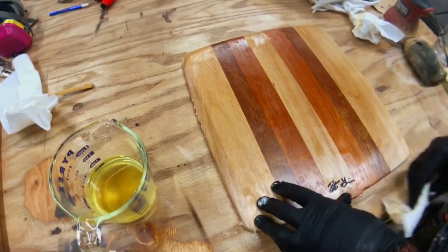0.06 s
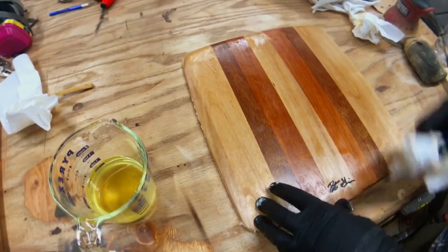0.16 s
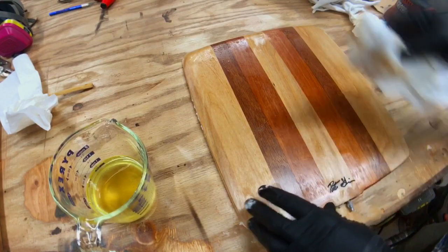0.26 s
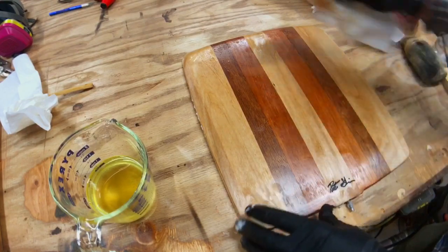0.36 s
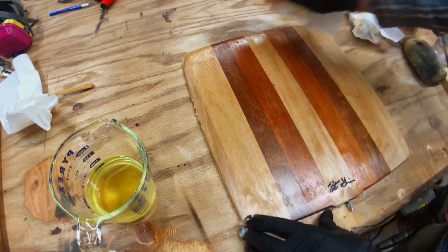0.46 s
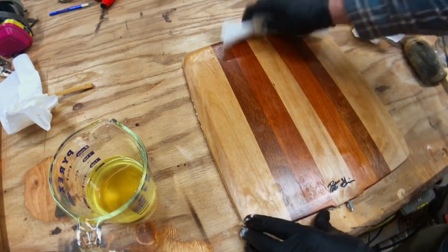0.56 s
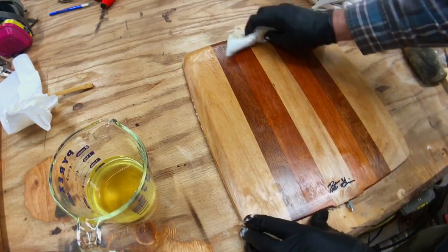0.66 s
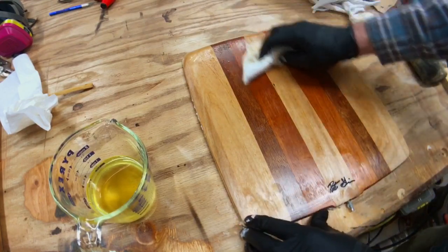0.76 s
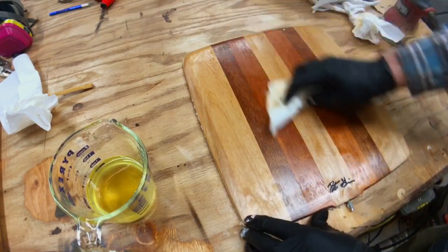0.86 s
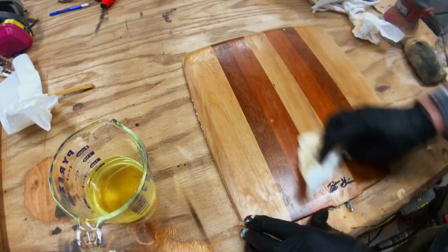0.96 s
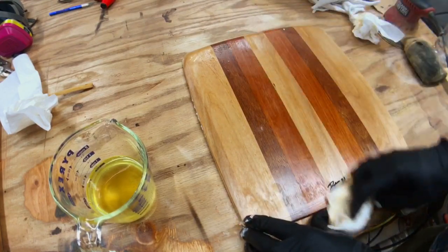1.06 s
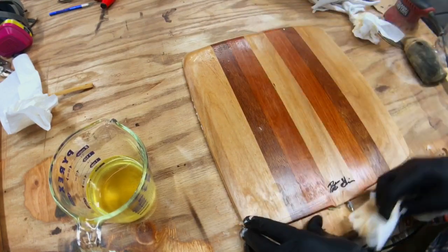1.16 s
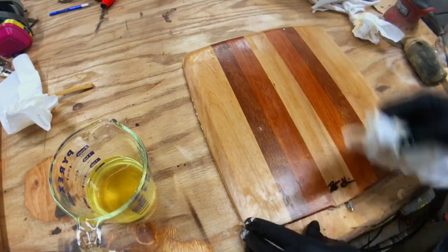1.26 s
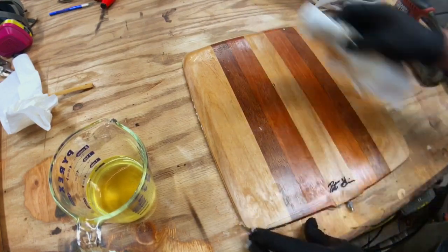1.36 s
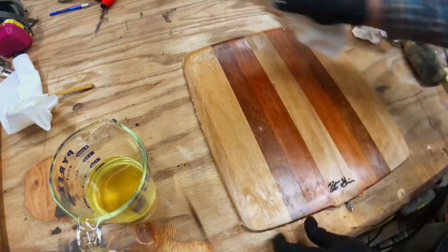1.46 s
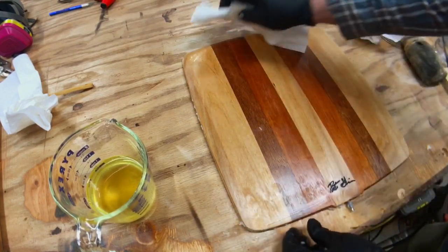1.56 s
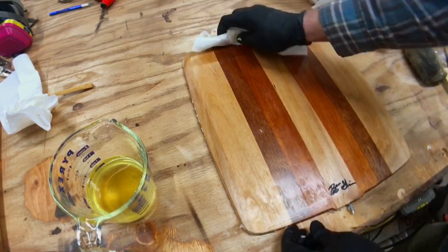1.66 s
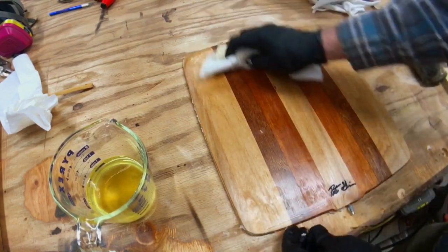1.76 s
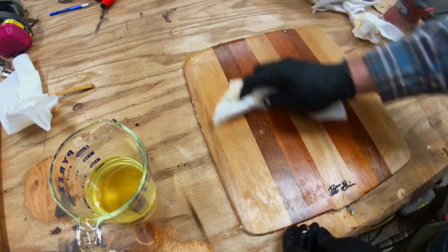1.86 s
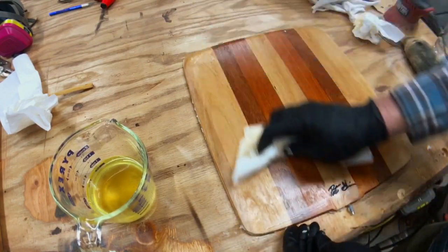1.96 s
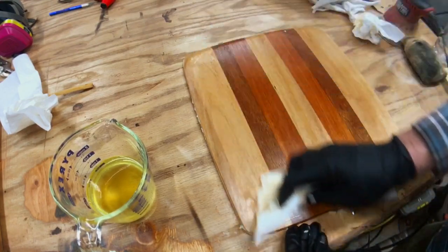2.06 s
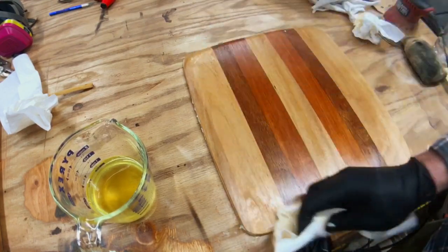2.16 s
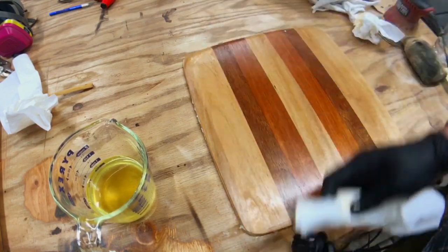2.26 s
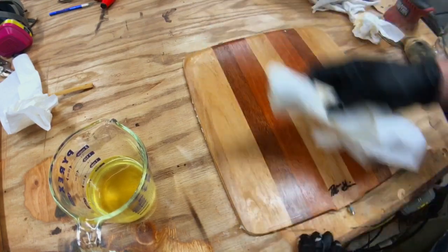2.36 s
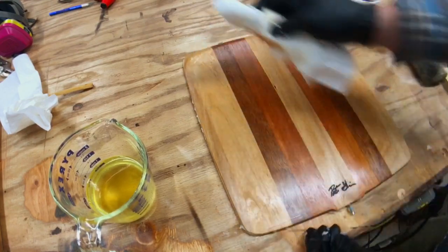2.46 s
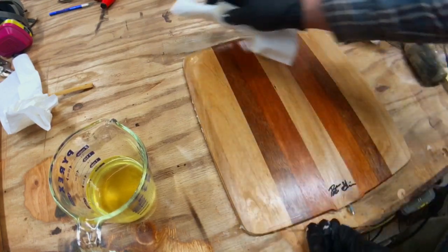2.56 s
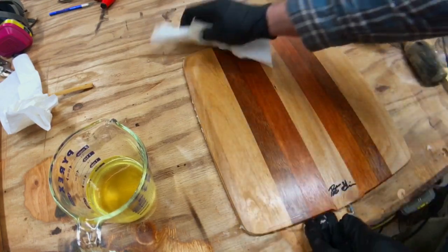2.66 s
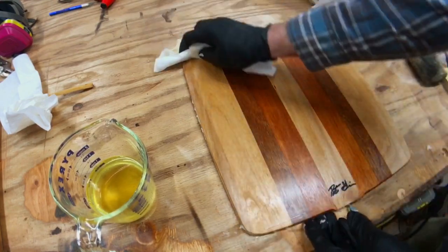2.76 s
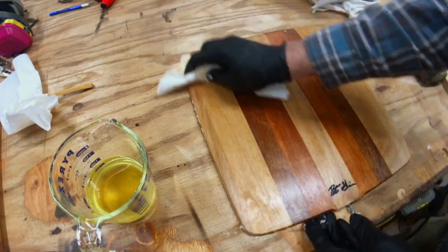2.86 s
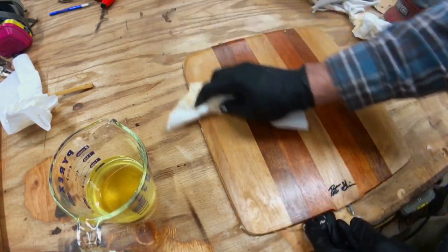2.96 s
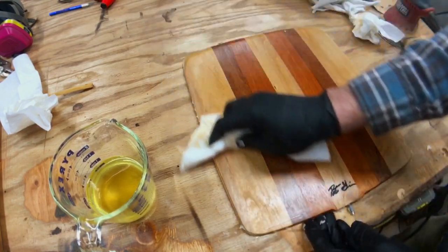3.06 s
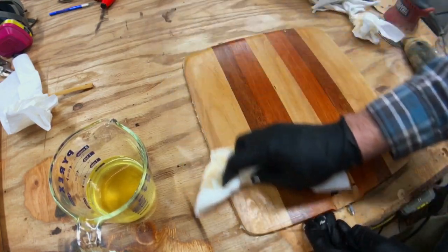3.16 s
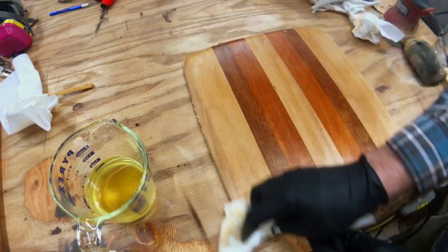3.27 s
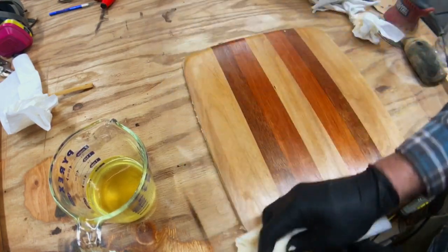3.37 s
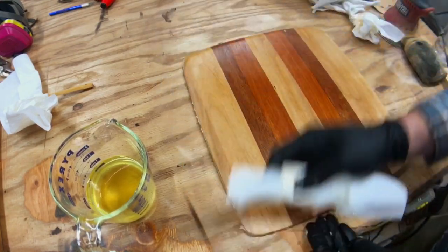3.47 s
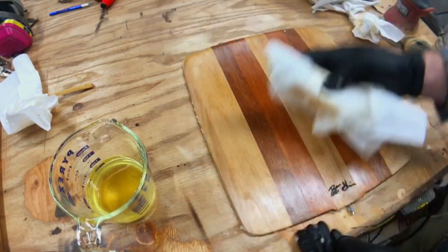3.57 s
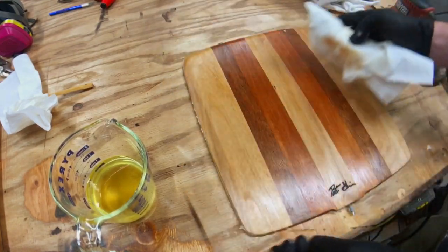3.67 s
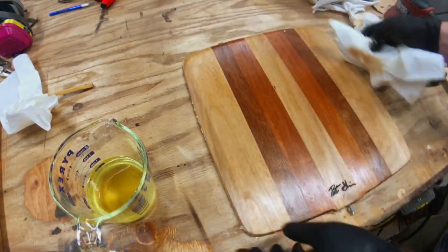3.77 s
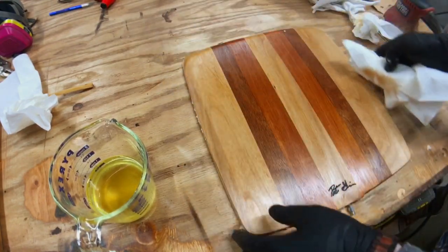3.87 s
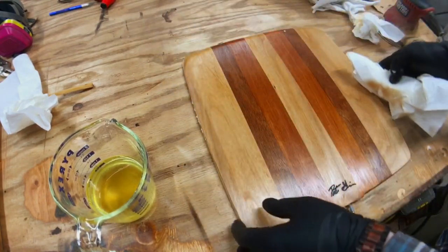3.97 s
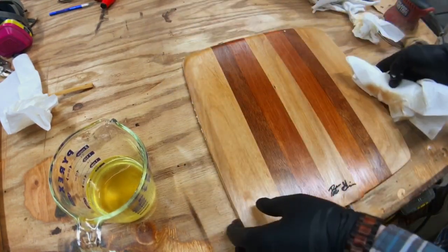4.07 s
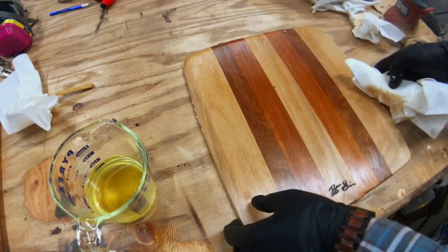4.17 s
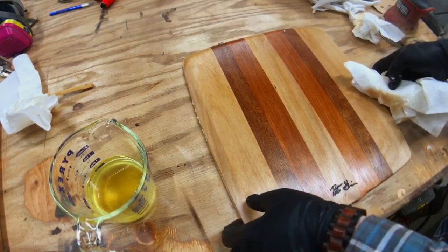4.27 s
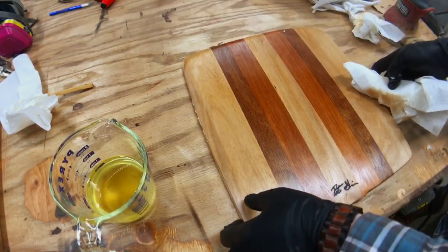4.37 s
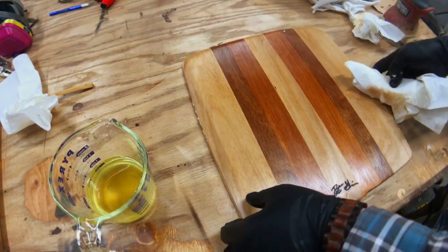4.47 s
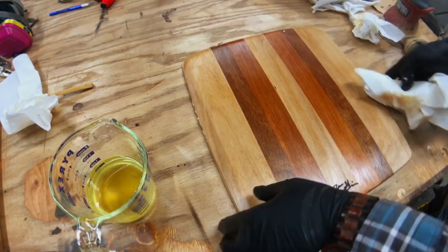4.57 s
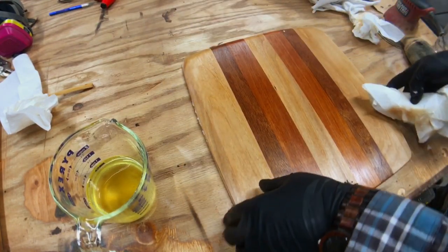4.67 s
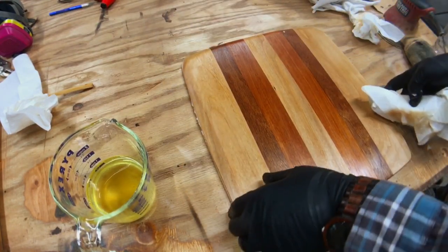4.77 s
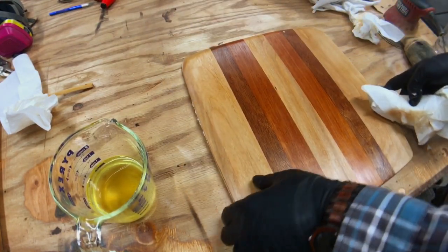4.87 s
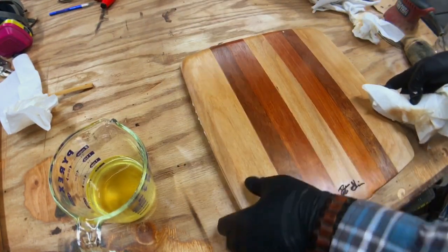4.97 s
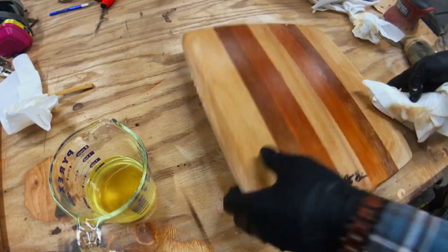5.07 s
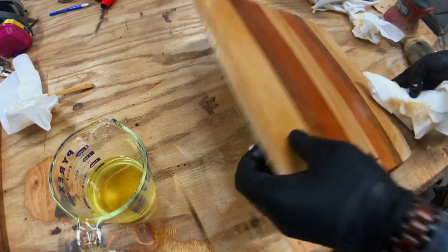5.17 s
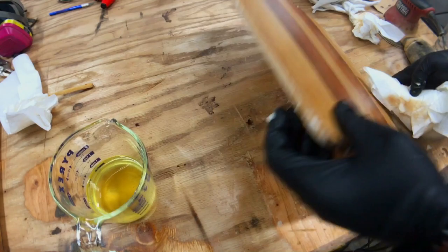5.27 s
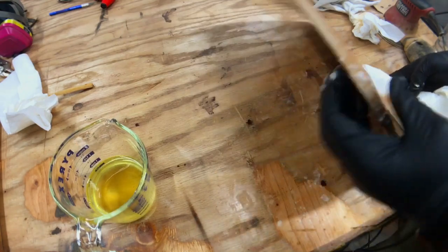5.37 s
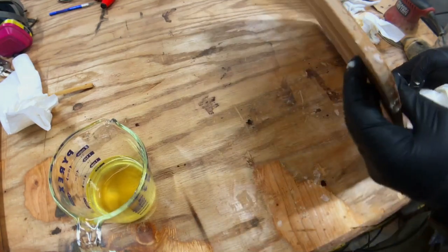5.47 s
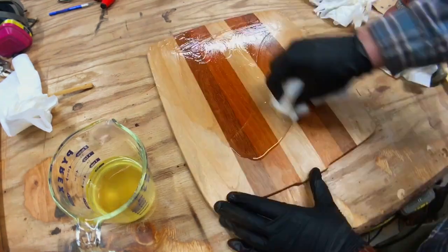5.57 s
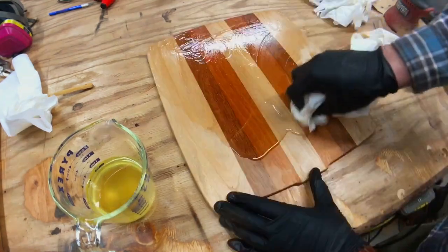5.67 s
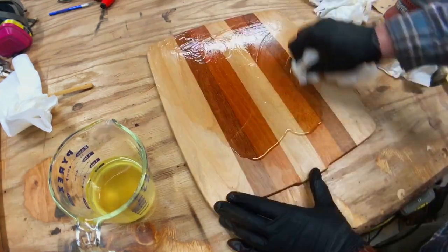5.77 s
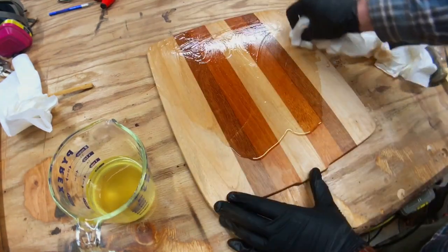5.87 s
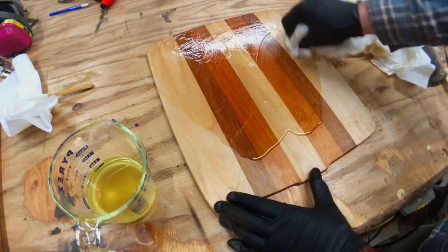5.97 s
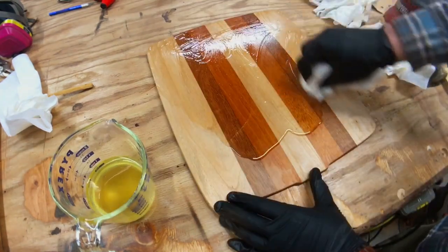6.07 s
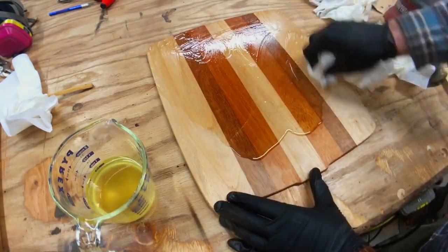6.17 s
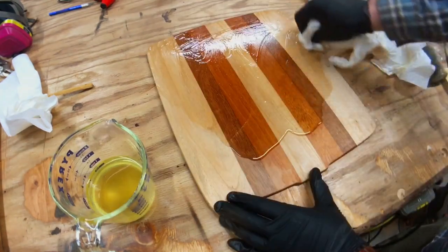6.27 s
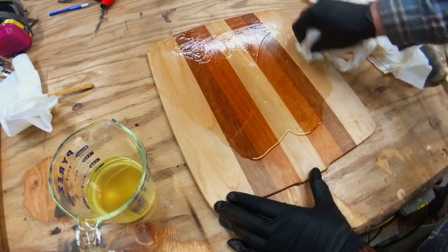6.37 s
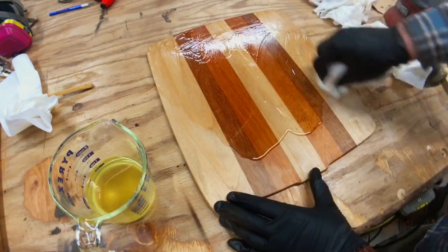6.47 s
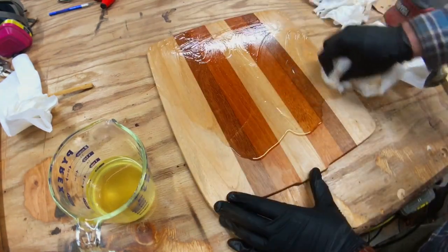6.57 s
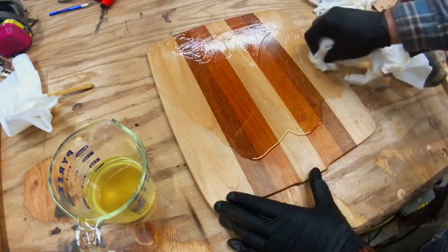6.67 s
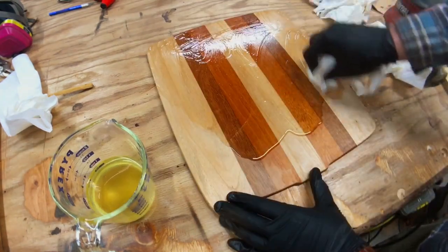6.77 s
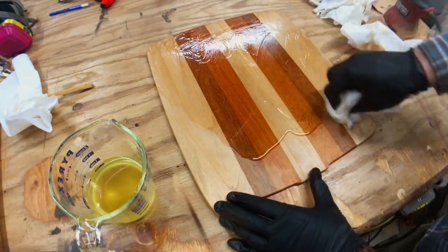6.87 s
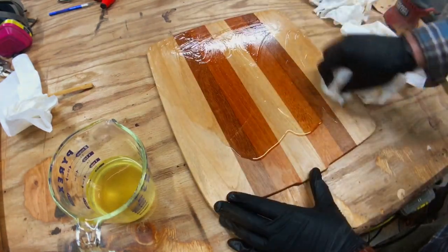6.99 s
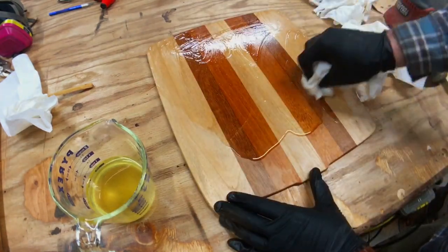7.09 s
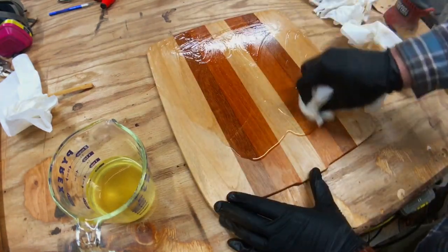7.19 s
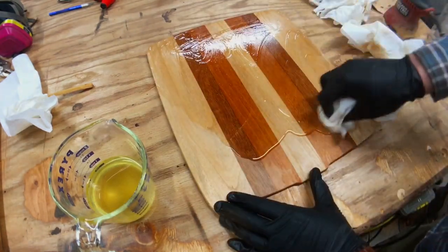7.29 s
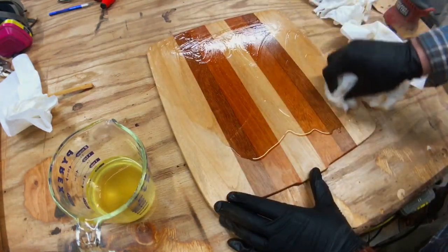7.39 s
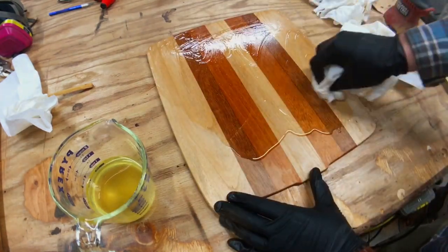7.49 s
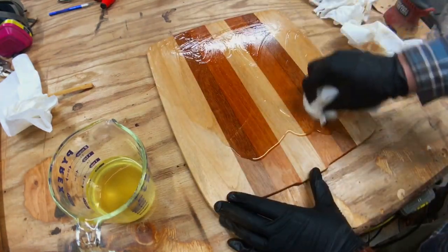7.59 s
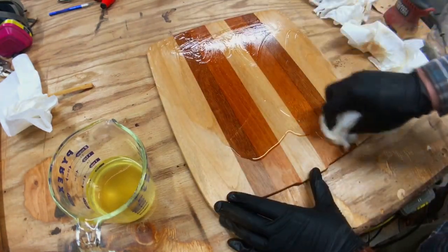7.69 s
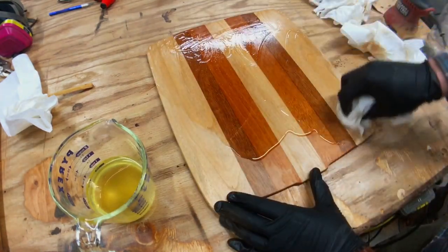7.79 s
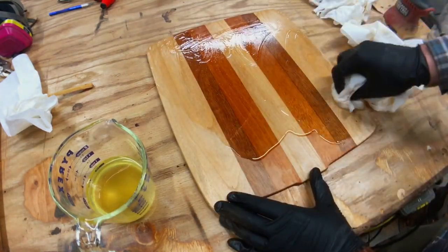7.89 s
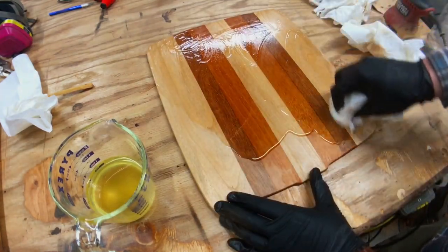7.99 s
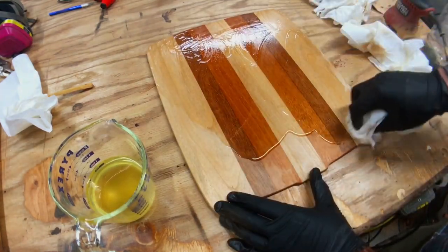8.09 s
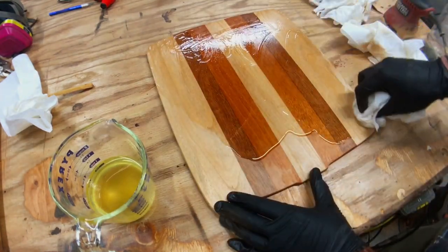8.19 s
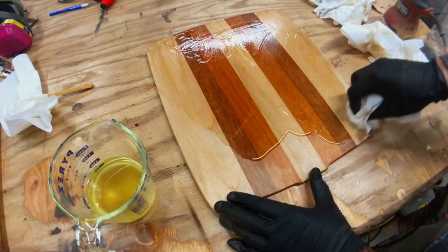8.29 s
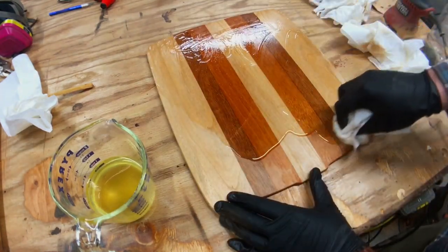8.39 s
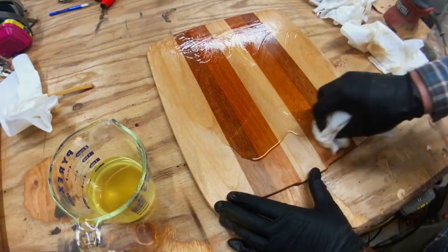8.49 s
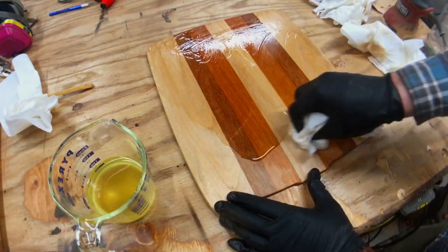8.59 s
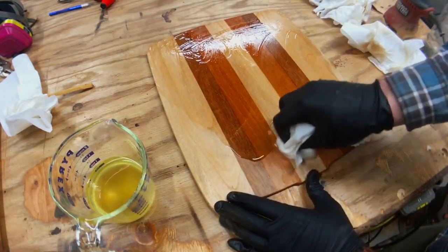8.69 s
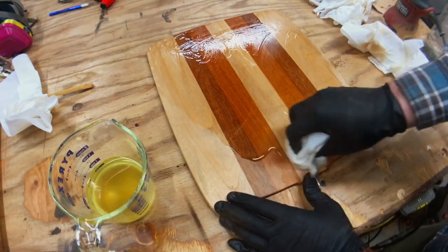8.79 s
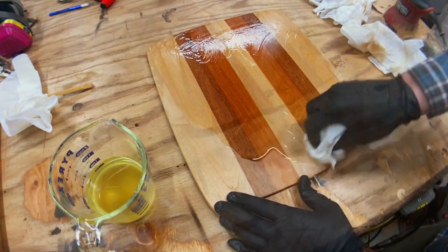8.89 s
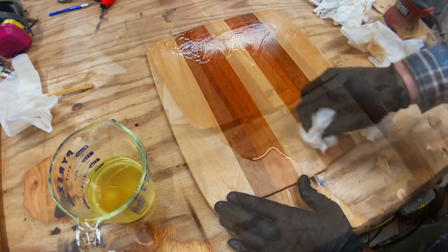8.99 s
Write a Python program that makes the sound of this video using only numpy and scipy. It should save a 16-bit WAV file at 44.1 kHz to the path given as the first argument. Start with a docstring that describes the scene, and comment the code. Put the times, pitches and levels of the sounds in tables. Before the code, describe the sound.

Dry, hissy wipes of cloth on wood with sharp taps between them, a board dragged and bumped on a bench, then faint gentle rubbing.

```python
"""A gloved hand's rag wipes oil over a wooden board: long strokes, later small light circles, in filtered noise.
Cloth shifts and flicks between strokes; bench and board murmur as resonated noise over a low shop rumble.
Taps are clicks with noise tails; pats and edge bumps are short pushes into decaying modes.
The board is dragged and tipped: uneven stick-slip pulses ring it. Handling stops abruptly at 5.639 s
and wood sounds fall silent for half a second; light circling begins at once."""
import sys
import numpy as np
from scipy import signal
from scipy.fft import rfft, irfft, next_fast_len
from scipy.io import wavfile
from scipy.ndimage import uniform_filter1d

SR = 44100
rng = np.random.default_rng(int(sys.argv[2]) if len(sys.argv) > 2 else 0)


def dump(signal):
    """Clip the signal to [-1, 1] and save it as 16-bit WAV at the path in sys.argv[1]."""
    limited = np.clip(np.atleast_2d(signal).T, -1, 1)
    pcm = np.round(limited * 32767).astype(np.int16)
    wavfile.write(sys.argv[1], SR, pcm)


N = 398663

# Long rag strokes: lands_s, fastest_s, lifts_s, swish_db, fine_hiss_rel_db, lift_speed_0_to_1, release_t60_s
STROKES = [(-.35, -.03, .148, -43.5, -5.5, 0.91, 0.12), (0.677, 1.01, 1.204, -41.5, -2.5, 0.72, .17),
           (1.706, 2.0, 2.305, -41.5, -3, .4, 0.16), (2.775, 3.276, 3.495, -43.5, -5, 0.38, 0.28)]
# Spectrum of firm cloth on wood: freq_hz, level_db
STROKE_COLOUR = [(300, -17.5), (900, -15), (1500, -7), (2300, -3), (3000, -1), (4200, 6), (4900, -3.5),
                 (5800, -11), (7200, -25.5), (9300, -14), (10400, -15), (12500, -6.5), (15700, -17.5)]
# Spectrum of light cloth contact: freq_hz, level_db
LIGHT_COLOUR = [(300, -11), (900, -13.5), (1600, -8.5), (2200, -5), (3000, -3.5), (4200, 3.5), (4900, -4.5),
                (5800, -12.5), (7200, -30.5), (9300, -17.5), (10400, -20.5), (12500, -10), (15700, -23)]
# Rag, sleeve and gloves shifting: middle_s, length_s, swish_db, fine_hiss_rel_db, drag_rel_db
RUSTLES = [(.25, 0.2, -63.5, -6, -2), (.645, 0.05, -49, -9, -4), (1.31, 0.13, -68, -4, -8),
           (1.575, 0.075, -56.5, -4.5, -11), (1.645, 0.088, -55, -12, -10), (1.7, 0.045, -46, -10, -1.5),
           (2.55, 0.073, -59.5, -14, -21), (2.68, 0.14, -56.5, -12, -9), (2.772, 0.036, -50.5, -7, -6.5),
           (3.55, 0.14, -68, -2, 5.5), (3.665, 0.11, -56, -14, -6), (3.77, 0.045, -55, -1.5, -11),
           (3.89, 0.15, -60.5, -2, 0.5), (4.05, 0.22, -61.5, -7, -2.5), (4.28, 0.021, -63.5, -4, 0),
           (4.57, .13, -57, -10.5, -13), (4.63, .04, -64, 0, 3), (4.76, 0.1, -62.5, -4, -5),
           (4.995, 0.1, -57, -17, -3), (5.095, 0.12, -49, -9.5, -8), (5.23, .12, -56.5, -9, -4),
           (5.33, 0.087, -63, -1, -4), (5.41, 0.093, -53, -14, -1.5), (5.458, 0.05, -51.5, -1.5, 2),
           (5.555, 0.099, -52, -17, -2), (5.62, 0.08, -49.5, -18, 3.5)]
# Pushes of the circling rag: middle_s, length_s, swish_db, fine_hiss_rel_db, drag_rel_db
CIRCLES = [(5.73, .05, -62.5, -20, -3), (5.785, 0.04, -52, -12, -14), (5.93, 0.12, -57, 6.5, -5),
           (6.04, 0.11, -60, 1, -0.5), (6.29, 0.093, -57.5, 8.5, -3), (6.43, 0.2, -57, -1.5, -4.5),
           (6.68, 0.13, -53.5, 2.5, -4.5), (6.82, .13, -55.5, -0.5, -4.5), (7.04, 0.21, -58, 1.5, -10),
           (7.21, 0.16, -59.5, -2, -5.5), (7.46, 0.12, -61, -2, -6), (7.63, 0.18, -55, -5, -7),
           (7.79, 0.25, -60.5, -5.5, -4), (7.91, 0.071, -60, 2.5, -19), (8.06, 0.12, -57.5, -8, -14),
           (8.265, 0.08, -51, -3.5, -13), (8.39, .1, -53.5, -3.5, -12), (8.53, 0.48, -55, -5, -9),
           (8.7, 0.19, -59, -1.5, -5), (8.84, 0.24, -58, -21, -8.5), (8.97, 0.18, -55.5, -2, -7)]
# Steady contact before the cut: swish_db, fine_hiss_rel_db, drag_rel_db
HELD_RAG = (-72, -6, 0)
# Steady contact while circling: swish_db, fine_hiss_rel_db, drag_rel_db
RESTING_RAG = (-64, -1.5, -6)
# Circling hand's weight on the rag: time_s, share_0_to_1
BEARING_DOWN = [(5.64, 0.38), (5.9, 0.96)]
# Board murmur under the hands: time_s, level_db
BOARD_MURMUR = [(2.8, -87), (3.3, -67.5), (4.5, -76), (5.2, -62), (5.7, -98), (7.1, -90), (7.3, -67),
                (7.8, -62), (8.2, -77.5), (9.04, -68)]
# Bench rumble as the hands lean: time_s, level_db
BENCH_RUMBLE = [(0, -69), (2.3, -65), (2.7, -74), (4.55, -82), (4.72, -56), (5.15, -64), (5.8, -77),
                (7.2, -61.5), (9.04, -59)]
# Bench resonances: freq_hz, width_hz, level_db
BENCH_MODES = [(43, 6.9, -21), (67, 14, 4), (95, 37, -10.5), (161, 66, -12)]
# Workshop background spectrum: freq_hz, level_db
SHOP_COLOUR = [(25, -21), (45, -5.5), (66, 4), (100, -1.5), (170, -5.5), (260, -7.5), (430, -22.5),
               (600, -16.5), (1200, -20.5), (2500, -23.5), (4200, -22.5), (7200, -36.5), (12500, -34),
               (15700, -37)]
# Sharp taps of wood and fingers: start_s, peak_db, dull_above_hz
TAPS = [(.076, -43.5, 900), (.138, -20.5, 4000), (.587, -30.5, 1440), (.615, -36, 2000),
        (0.637, -15.5, 1700), (.6395, -30, 1120), (0.652, -31, 2200), (0.699, -42, 1500),
        (1.125, -38, 1570), (1.190, -25, 2600), (1.357, -41.5, 3200), (1.6043, -33.5, 1500),
        (1.645, -35, 2600), (1.69, -36.5, 1100), (2.42, -49, 2600), (2.634, -38.5, 1390),
        (2.763, -36, 2004), (2.772, -39.5, 1390), (4.056, -31, 1760), (4.062, -34.5, 1720),
        (4.604, -40, 3500), (4.629, -39.5, 1300), (5.047, -41, 1590), (5.476, -28.5, 870),
        (5.609, -35, 1700), (6.223, -34.5, 4000), (7.815, -41, 2600), (8.704, -49, 1500),
        (9.014, -39.5, 740), (9.025, -37, 890)]
# Board rocking flat on the bench: start_s, peak_db, contact_ms
PATS = [(.139, -30.5, 0.79), (.155, -31.5, 0.78), (.638, -36, 1.9), (.649, -22, 3.6), (.669, -32, 2.7),
        (1.192, -40.5, 4.4), (1.688, -30, 0.38), (1.699, -24.5, 3.1), (1.719, -38, 2.1), (2.29, -42.5, 1.4),
        (2.763, -37, 1.3), (2.774, -34.5, 3.45), (2.786, -31.5, 9.3), (5.075, -44, 2), (7.782, -41, 1.3)]
# Modes of the board lying flat: freq_hz, level_db, t60_s
FLAT_MODES = [(60.3, -7, 0.18), (91.8, -17.5, 0.74), (154.5, 0.5, 0.079), (193, -6.5, 0.082),
              (272, -7.5, 0.086), (358, -21, 0.071), (570, -10, 0.077)]
# Board edge bumping the bench: start_s, peak_db, contact_ms
BUMPS = [(4.057, -40, 0.66), (4.072, -40, 1), (5.445, -29, 1.3), (5.457, -24, 1.3), (5.467, -44, 3.3),
         (5.474, -19, 1.04), (5.478, -17, 2.43), (5.495, -39, 1.7), (5.5005, -22, 2.2), (5.553, -38, 1.6),
         (5.588, -36, 3.6), (5.6075, -22, 0.44), (5.619, -31, 1.3), (5.632, -37, 0.47), (7.815, -44, 0.65),
         (8.835, -43, 1.4), (9.012, -42, 0.55), (9.025, -33, 0.8)]
# Modes of the board on edge: freq_hz, level_db, t60_s
EDGE_MODES = [(72.5, 3.5, 0.054), (160.5, -4.5, 0.19), (182.5, -3, 0.16), (251, -1, 0.058),
              (307, -1, 0.039), (374, 2, 0.12), (491, -3, 0.088), (627, 1, 0.036), (800, -8, 0.049),
              (1030, -2.5, 0.057), (1215, 1, 0.043), (1520, -26, 0.044), (1850, -6, 0.038)]
# Loose rag flicking in the air: start_s, level_db, t60_s
FLICKS = [(1.552, -52, 0.13), (3.75, -52, 0.11), (4.215, -57, 0.15)]
# Board dragged over the bench: time_s, level_db, base_slips_per_s
DRAG = [(4.98, -85, 212), (5.04, -50, 222), (5.055, -47, 276), (5.11, -47.5, 350), (5.132, -51, 300),
        (5.155, -44.5, 290), (5.2, -44, 280), (5.225, -47.5, 263), (5.27, -64, 210), (5.31, -84, 206)]
# Resonances of the dragged board: freq_hz, width_hz, flat_db, tilted_db
DRAG_MODES = [(558, 28, -28, 0.5), (695, 33, -11, -21), (841, 23, -18, 2.5), (1048, 54, -2.5, -2),
              (1210, 150, -6.5, 1.5), (1420, 31, -3, -19), (2050, 64, -18, -9.5), (2420, 200, -10, -10),
              (3610, 40, 0, -17), (4110, 37, -12, 4.5)]

T = np.arange(N) / SR
CONTROL_T = T[::64]
CUT_S, TILT_S, TOP_HZ = 5.639, 5.135, 15700
LANDING_SPEED, ATTACK_S = 0.46, 0.044  # share of top speed at touch-down; cloth settling time
FINE_POWER, DRAG_POWER = 1.42, 0.1  # growth with speed
DRAG_REL_DB, EASING_DB_PER_S = -13.5, 4.5  # drag re swish; the hand presses hardest as it lands
SWELL_SHAPE = 1.96  # 2 is a Gaussian bell; more is flatter on top, steeper at the sides


def undb(db):
    """Decibels to gain."""
    return 10 ** (np.asarray(db) / 20)


def unit(x):
    """Scale to rms 1."""
    return x / np.sqrt(np.mean(x ** 2))


def curves(table):
    """Columns of a table, interpolated linearly over time_s."""
    time_s, *columns = np.transpose(table)
    return [np.interp(T, time_s, column) for column in columns]


def colour(x, points):
    """Zero-phase filter by a spectrum, linear in dB over log frequency."""
    hz, db = np.transpose(points)
    size = next_fast_len(N)
    f = np.maximum(np.fft.rfftfreq(size, 1 / SR), 1)
    gain = undb(np.interp(np.log(f), np.log(hz), db))
    return irfft(rfft(x, size) * gain, size)[:N]


def above(x, hz, steepness=6):
    """Part of x above a soft crossover; the rest is x minus this."""
    size = next_fast_len(N)
    ratio = (np.fft.rfftfreq(size, 1 / SR) / hz) ** steepness
    return irfft(rfft(x, size) * ratio / (1 + ratio), size)[:N]


def band(x, hz, kind, order=2):
    """Butterworth filter."""
    sos = signal.butter(order, np.minimum(hz, SR / 2 - 1), kind, fs=SR, output="sos")
    return signal.sosfilt(sos, x)


def resonate(x, modes):
    """Parallel resonances of freq_hz, width_hz, level_db."""
    return sum(undb(db) * signal.lfilter(*signal.iirpeak(hz, hz / width, fs=SR), x)
               for hz, width, db in modes)


def walk(rate_hz):
    """Smoothed random wander of rms 1."""
    hold = int(SR / rate_hz)
    steps = np.repeat(rng.standard_normal(N // hold + 1), hold)
    return unit(uniform_filter1d(steps, hold)[:N])


def fade(t, t60_s):
    """Exponential decay, 60 dB in t60_s."""
    return np.exp(-np.log(1000) * t / t60_s)


def add(out, start_s, x):
    """Mix x into out from start_s."""
    i = int(start_s * SR)
    out[i:i + len(x)] += x[:N - i]


def swell(middle_s, length_s):
    """Smooth rise and fall of rubbing; length_s spans the 1/e points."""
    return np.exp(-np.abs(2 * (CONTROL_T - middle_s) / length_s) ** SWELL_SHAPE)


def long_strokes(edge_db=-12, edge_lead_s=.01, edge_length_s=0.055):
    """Swish, fine and drag gains: the hand speeds up, slows and lifts, scuffing the board's edge."""
    t, gains = CONTROL_T, 0
    for lands_s, fastest_s, lifts_s, db, fine_rel_db, lift_speed, t60_s in STROKES:
        arch = np.cos(np.interp(t, [lands_s, fastest_s, lifts_s], [-1, 0, 1]) * np.pi / 2)
        slowest = np.where(t < fastest_s, LANDING_SPEED, lift_speed)
        speed = slowest + (1 - slowest) * arch
        landing = np.clip((t - lands_s) / ATTACK_S, 0, 1)
        contact = landing * fade(np.maximum(t - lifts_s, 0), t60_s)
        swish = contact * speed
        fine = undb(fine_rel_db) * swish ** FINE_POWER
        drag_db = DRAG_REL_DB - EASING_DB_PER_S * (t - lands_s)
        drag = undb(drag_db) * contact * speed ** DRAG_POWER
        scuff = undb(edge_db) * lift_speed * swell(lifts_s - edge_lead_s, edge_length_s)
        gains = gains + undb(db) * np.array([swish, fine, drag + scuff])
    return gains


def short_rubs(table, steady, touching):
    """Swish, fine and drag gains: swells of rubbing power-summed with a faint steady contact."""
    rubs = [(swell(middle_s, length_s), *levels) for middle_s, length_s, *levels in table]
    rubs.append((touching, *steady))
    power = 0
    for shape, db, fine_rel_db, drag_rel_db in rubs:
        levels_db = [db, db + fine_rel_db, db + drag_rel_db]
        power = power + np.outer(undb(levels_db), shape) ** 2
    return np.sqrt(power)


def rag(gains, spectrum, dull_below_hz, snags_per_s, snag_db, flutter_db, patchy_db):
    """Countless fibres slip as a dense swish, a few snag and snap; grip flutters as folds shift."""
    snags = (rng.random(N) < snags_per_s / SR) * rng.standard_normal(N)
    fibres = colour(rng.standard_normal(N) + undb(snag_db) * unit(snags), spectrum)
    # faint delayed copy of the rubbing, its lag drifting slowly at random
    lag_s = 0.001221 * np.exp(0.312 * walk(3))
    fibres = fibres + np.interp(T - lag_s, T, fibres) / 4
    treble = above(fibres, dull_below_hz)
    fine = above(fibres, 7630, steepness=7.5)
    sound = 0
    for part, gain in zip([treble - fine, fine, fibres - treble], gains):
        patches = undb(patchy_db * walk(40))
        sound = sound + unit(part) * np.interp(T, CONTROL_T, gain) * patches
    return sound * undb(flutter_db * walk(70))


def murmur():
    """Friction and weight of the hands faintly drive the low modes of board and bench."""
    board = resonate(rng.standard_normal(N), [(213, 42, -1), (340, 33, 1), (368, 90, -1)])
    bench = resonate(rng.standard_normal(N), BENCH_MODES)
    rubbed = unit(band(board, 460, "low", order=3)) * undb(curves(BOARD_MURMUR)[0])
    leaned = unit(band(bench, [30, 260], "band")) * undb(curves(BENCH_RUMBLE)[0])
    return rubbed + leaned


def shop(level_db=-60):
    """Low, slightly wavering background rumble: coloured noise."""
    return unit(colour(rng.standard_normal(N), SHOP_COLOUR)) * undb(level_db + 0.51 * walk(3.8))


def taps(ring_db=-21, ring_t60_s=0.012):
    """A dry click of contact, then a brief noise ring of the wood's crowded upper modes."""
    out, t = np.zeros(N), T[:SR // 10]
    for start_s, peak_db, dull_hz in TAPS:
        noise = rng.standard_normal(len(t))
        click = (t == 0) + undb(ring_db) * noise * fade(t, ring_t60_s)
        click = band(click, [350, max(dull_hz, 600)], "band", order=3)
        click = band(click, 4100, "low", order=4)
        add(out, start_s, click * undb(peak_db) / np.abs(click).max())
    return out


def knocks(table, modes, detune):
    """Each blow is a short push into the modes; longer contact leaves only the low ones."""
    out, t = np.zeros(N), T[:SR // 2]
    hz, db, t60_s = np.transpose(modes)[:, :, None]
    for start_s, peak_db, contact_ms in table:
        blow_hz = hz * (1 + detune * rng.standard_normal((len(modes), 1)))
        ring = np.sum(undb(db) * fade(t, t60_s) * np.sin(2 * np.pi * blow_hz * t), axis=0)
        push = np.hanning(int(contact_ms * SR / 1000) + 3)
        blow = band(signal.fftconvolve(ring, push), 67, "high", order=3)  # boards radiate little deep bass
        add(out, start_s, blow * undb(peak_db) / np.abs(blow).max())
    return out


def room(x, wet_db=-15, t60_s=0.37):
    """Short, dull reflection tail from the cluttered shop: convolution with decaying noise."""
    t = T[:SR // 2]
    tail = band(rng.standard_normal(len(t)), 4500, "low") * fade(t, t60_s) * (t > .004)
    return x + undb(wet_db) * signal.fftconvolve(x, tail / np.linalg.norm(tail))[:N]


def flicks():
    """Folds of cloth snap open with a brief rustle: decaying, unsteady noise."""
    envelope = np.zeros(N)
    for start_s, db, t60_s in FLICKS:
        add(envelope, start_s, undb(db) * fade(T[:SR // 4], t60_s))
    rustle = rng.standard_normal(N) * undb(3.2 * walk(900))
    return envelope * unit(colour(rustle, LIGHT_COLOUR))


def drag_board(jitter=.22, grit_db=-10, uneven_db=3.5):
    """Wood sticks and slips on wood; uneven slips ring the board, whose modes change as it tilts."""
    db, slips_per_s = curves(DRAG)
    slip_count = np.floor(np.cumsum(slips_per_s * np.exp(jitter * walk(300))) / SR)
    slips = np.diff(slip_count, prepend=0)
    force = unit(slips) + undb(grit_db) * rng.standard_normal(N)
    force = force * undb(uneven_db * walk(150))
    hz, width_hz, flat_db, tilted_db = np.transpose(DRAG_MODES)
    flat = resonate(force * (T < TILT_S), zip(hz, width_hz, flat_db))
    tilted = resonate(force * (T >= TILT_S), zip(hz, width_hz, tilted_db))
    moving = (T > DRAG[0][0]) * (T < DRAG[-1][0])
    return unit(band(flat + tilted, [450, 4800], "band", order=5)) * undb(db) * moving


def scene():
    """Wiping and turning the board, an abrupt cut of handling and wood, light circling from the cut on."""
    holding = 1. * (CONTROL_T < CUT_S)
    resting = np.interp(CONTROL_T, *np.transpose(BEARING_DOWN)) * (1 - holding)
    strokes = rag(long_strokes(), STROKE_COLOUR, dull_below_hz=1960,
                  snags_per_s=900, snag_db=-9.5, flutter_db=0.26, patchy_db=0.54)
    handling = rag(short_rubs(RUSTLES, HELD_RAG, holding), LIGHT_COLOUR, dull_below_hz=1850,
                   snags_per_s=300, snag_db=-5.5, flutter_db=1.0, patchy_db=1.5)
    circles = rag(short_rubs(CIRCLES, RESTING_RAG, resting), LIGHT_COLOUR, dull_below_hz=2990,
                  snags_per_s=400, snag_db=-9.5, flutter_db=0.68, patchy_db=1.1)
    pats = knocks(PATS, FLAT_MODES, detune=0.0061)
    bumps = knocks(BUMPS, EDGE_MODES, detune=0.0085)
    wood = room(taps() + pats + bumps + drag_board())
    # the cut takes the ring of the last bumps with it
    kept = uniform_filter1d(1. * ((T < CUT_S) | (T > CUT_S + .5)), size=100)
    cloth = strokes + flicks() + circles
    return (cloth + (handling + wood) * kept + murmur() + shop())[None]


def record(dry):
    """The recorder cuts the top: steep elliptic low-pass."""
    return signal.sosfilt(signal.ellip(12, .2, 70, TOP_HZ, fs=SR, output="sos"), dry)


dry = scene()
out = record(dry)
dump(out)
```